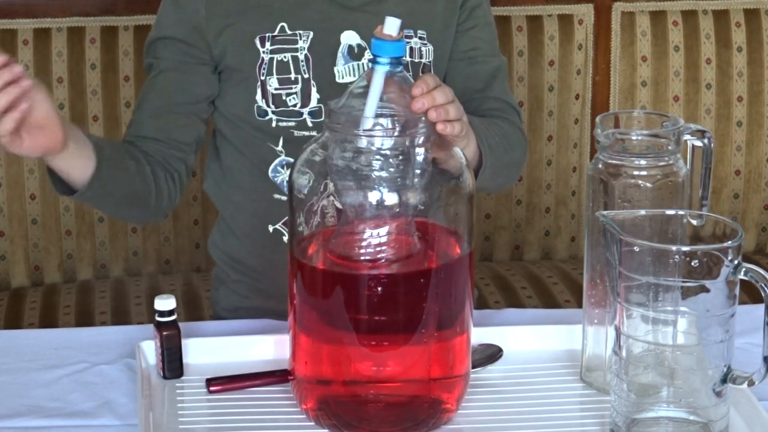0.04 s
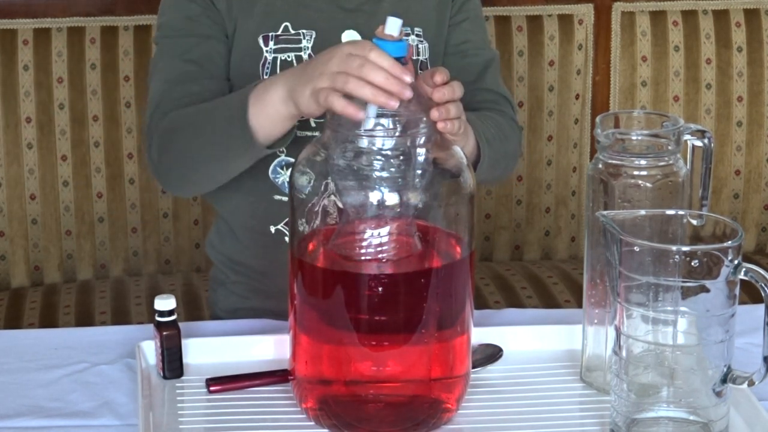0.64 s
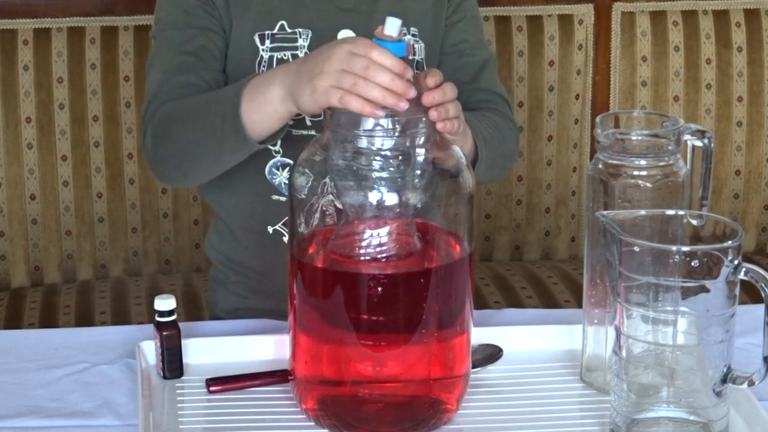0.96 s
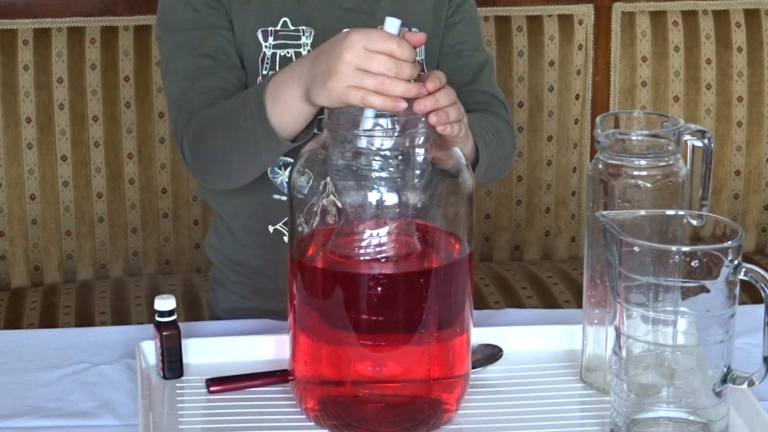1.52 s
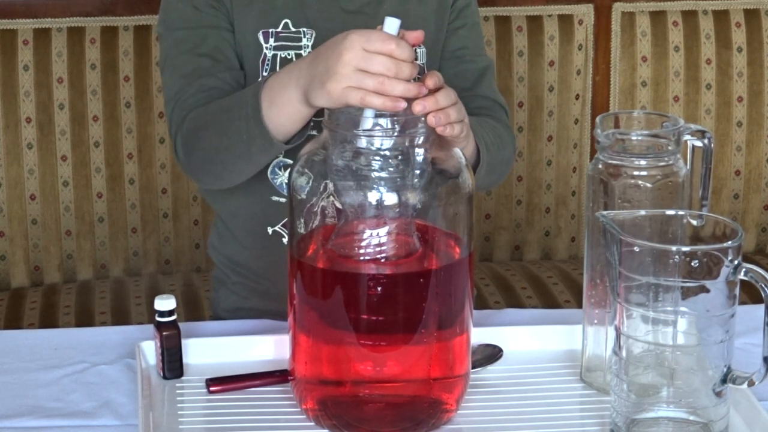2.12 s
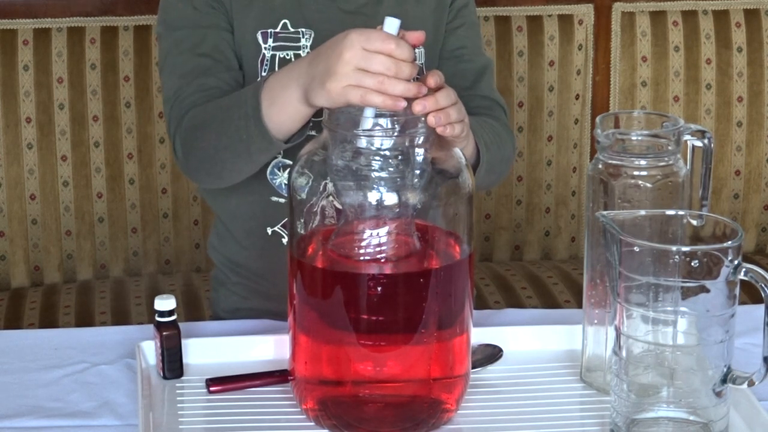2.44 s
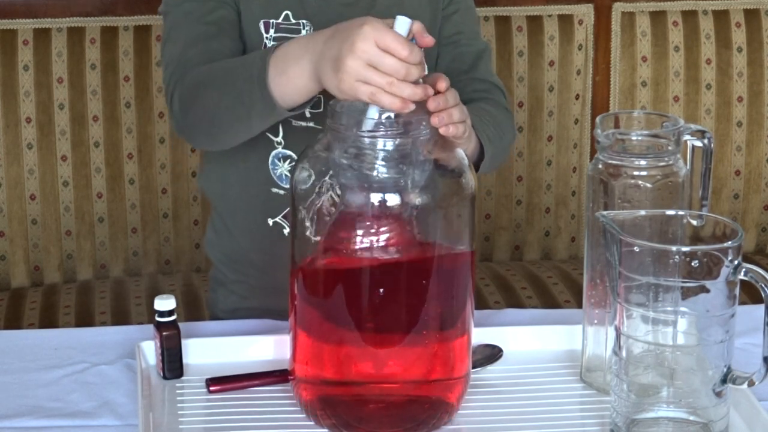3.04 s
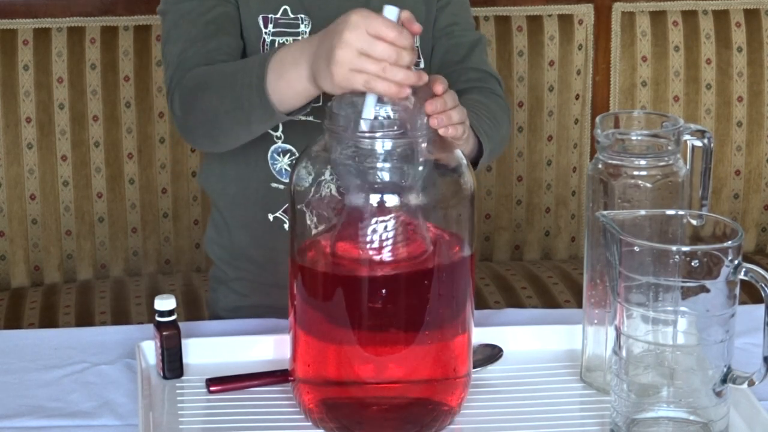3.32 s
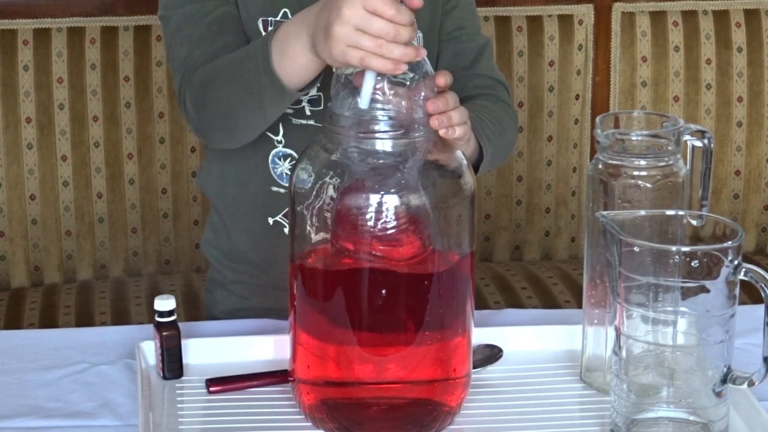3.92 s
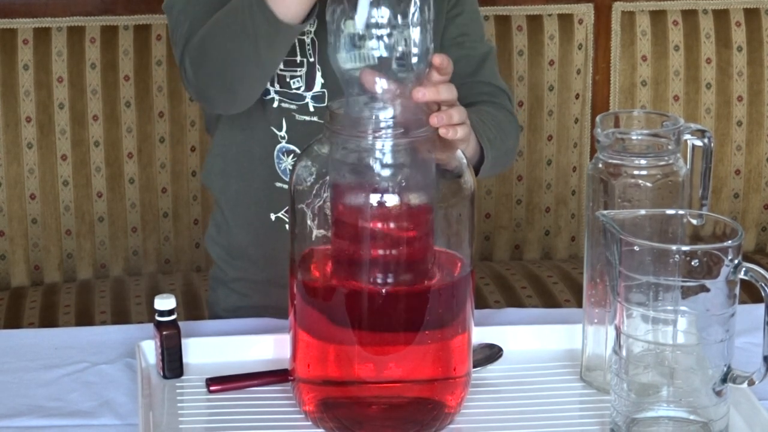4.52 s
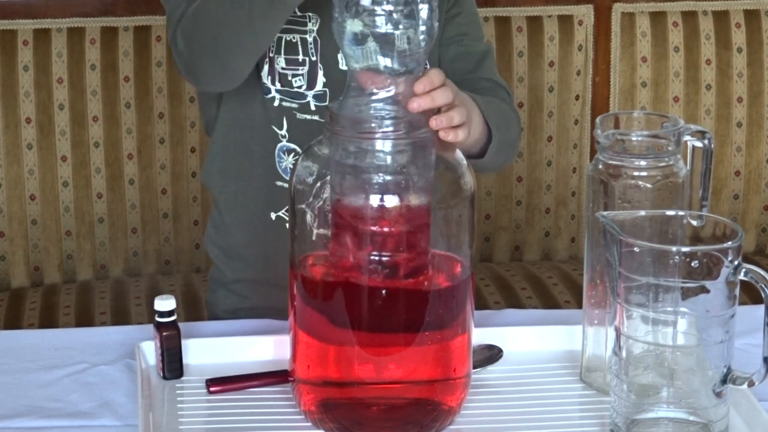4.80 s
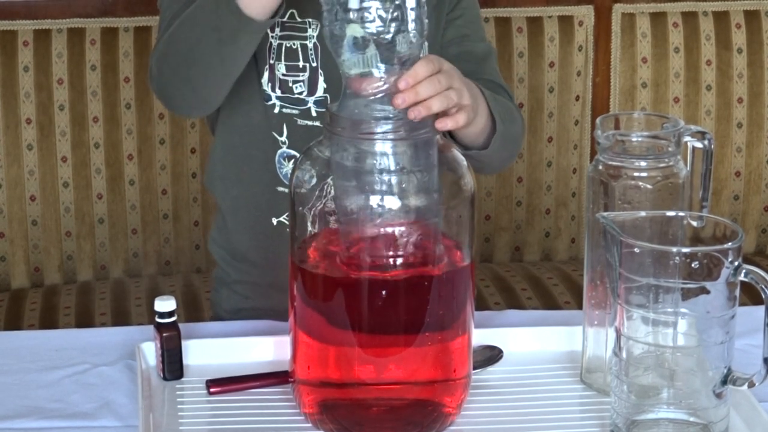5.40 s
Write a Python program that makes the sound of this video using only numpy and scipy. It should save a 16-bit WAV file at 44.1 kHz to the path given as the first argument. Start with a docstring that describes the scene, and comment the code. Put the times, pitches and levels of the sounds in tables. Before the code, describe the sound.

A plastic bottle snaps once and gives a few faint clicks over quiet room noise. It crackles, then bumps dully and rubs against a glass jar as it is lifted out. Its dented wall springs back with loud pops while air hisses in through a straw with a breathy, pipe-like ring. Finally water drips, gulps and bubbles in the jar. The sound is near and almost central, in a small room.

```python
"""A plastic snap over faint room noise: a bottomless bottle with a straw in its cap is gripped and
lifted out of a glass jar of water, in a small room. Its wall buckles, rubs and bumps on the jar.
As the water drains, air hisses in through the straw, ringing it like a pipe, and dents in the wall
spring out with loud pops. At the end the rim leaves the water with drips, gulps and small bubbles."""
import sys
import numpy as np
from scipy import signal
from scipy.fft import rfft, irfft
from scipy.io import wavfile
from scipy.ndimage import uniform_filter1d

SR = 44100
rng = np.random.default_rng(int(sys.argv[2]) if len(sys.argv) > 2 else 0)


def unload_wav(signal):
    """Save mono or channel-first audio to the path in sys.argv[1] as 16-bit WAV at rate SR, clipped to [-1, 1]."""
    wavfile.write(
        sys.argv[1],
        SR,
        np.round(np.clip(np.atleast_2d(signal).T, -1, 1) * 32767).astype(np.int16),
    )


N = 244755

# edges of a click's low, middle, high and top band: f/Hz
BAND_EDGES = [150, 1000, 2600, 7000, 14000]
# room tone and the wash of water: f/Hz, level/dB
ROOM_TONE_EQ = [(22, -30), (36, -24.5), (48, 4.5), (68, -5), (100, 0), (200, -2.5), (390, -6), (620, -8.5),
                (1050, -7.5), (1400, -14), (2000, -15.5), (3500, -19), (11500, -24.5), (16000, -30.5)]
WASH_EQ = [(20, -34), (33, -16), (48, -9), (80, -3), (145, -3.5), (300, -3), (600, -5), (1100, -8.5),
           (2500, -23.5)]
# water heaves under the bottle, one long swell and two surges: t/s, level/dB, rise/s, fall/s, hold/s
HEAVES = [(2.96, -61.5, .15, 0.57, 2.94), (3.223, -62.5, 0.072, 0.105, 0.033),
          (4.676, -48.5, 0.076, 0.13, .01)]

# the plastic wall snaps: t/s, low, middle, high and top level/dB, crackle tail/dB
# (the tail is how strongly each snap crackles on after its first click)
SNAPS = [(.009, -39.5, -51.5, -54.5, -68, 10), (.516, -82, -47.5, -50, -60.5, 7),
         (.534, -58, -41.5, -55.5, -60.5, 11), (1.031, -79, -46.5, -57.5, -81.5, 9),
         (2.8065, -37.5, -43.5, -47, -72, 5), (2.8345, -49, -43.5, -35.5, -42.5, 6),
         (2.9275, -47, -40, -36.5, -42.5, 2.5), (3.3175, -65, -49, -53.5, -86, -5),
         (3.4735, -77, -24, -44, -81, -0.5), (3.7268, -31.5, -24.5, -22.5, -55, 5.5),
         (3.935, -77.5, -75, -79, -62.5, -19), (4.1207, -15.5, -20.5, -26.5, -48, 7)]
# body of the wall: f/Hz, level/dB
WALL_EQ = [(40, -44), (150, -12.5), (400, -12.5), (800, -2), (1150, 0.5), (1400, -4), (1950, 0), (2350, 0),
           (2600, -2.5), (4200, -1.5), (6000, 0.5), (8200, 1.5), (11300, 7.5), (13000, -12), (15000, -15)]
# hand and bottle bump the jar: t/s, level/dB
BUMPS = [(0.022, -47.5), (0.048, -50), (.795, -48.5), (0.816, -47), (1.11, -52), (1.133, -52.5),
         (2.943, -46), (2.964, -45), (3.155, -28), (3.175, -23), (3.197, -25), (3.212, -34), (3.728, -44.5),
         (4.643, -54), (4.675, -42.5)]
# the jar's dull ring: f/Hz, level/dB, t60/s
BUMP_MODES = [(51.5, -20, 0.98), (144.3, -11.5, 0.22), (202, 2.5, 0.055), (191.9, 1, 0.044),
              (253, -11.5, 0.6), (273, -20, 0.053), (400, -3, 0.027)]
# the jar's air hums as the bottle starts to move: t/s, level/dB, rise/s, fall/s, hold/s
JAR_HUM = (3, -50.5, 0.1, 0.18, 0.2)
# fingers rub the bottle, and the bottle the jar's neck: t/s, level/dB, rise/s, fall/s
RUBS = [(1.182, -55, .03, 0.094), (3.171, -35.5, 0.0284, 0.04), (3.445, -44, 0.064, 0.0197)]
# colour of the friction: f/Hz, level/dB
RUB_EQ = [(40, -35), (210, -7), (350, -15), (691, -24.5), (766, -2.5), (825, -12), (1210, -6.5),
          (1510, -11), (2300, -4.5), (3360, -11.5), (4390, -23), (12000, -39), (15600, -68), (22000, -120)]

# pulls draw air through the straw, the last while it drains: t/s, level/dB, rise/s, fall/s, hold/s
PULLS = [(3.414, -49, .12, 0.102, 0.0247), (3.751, -48, 0.113, 0.06, 0.012),
         (3.923, -60, .04, 0.104, 0.031), (4.062, -39, 0.079, 0.078, 0.026),
         (4.379, -44, 0.32, 0.32, 0.4896)]
# the straw's open-pipe modes: f/Hz, width/Hz, level/dB
STRAW_MODES = [(1496, 284, -1), (3038, 126, 2.5), (4410, 220, -0.5), (5675, 190, -2), (7150, 400, -5.5)]
# rushing air, fine fizz and mist: f/Hz, level/dB
RUSH_EQ = [(40, -35), (180, -7), (300, -11.5), (913, -11), (1460, -2.5), (2490, -11.5), (3060, 3),
           (3560, -11.5), (4370, -5), (7270, -12.5), (8000, -22), (10400, -61), (17600, -120)]
FIZZ_EQ = [(6000, -62), (8300, -17), (9050, 2), (9700, -9), (10400, 2), (10850, 2.5), (11350, 2.5),
           (12200, -8), (12900, -8), (14000, -19), (16000, -28)]
MIST_EQ = [(5000, -20), (9500, -6), (13500, -6), (16000, -4)]
# the long draught tears mist off the wet straw: t/s, level/dB, rise/s, fall/s, hold/s, sag/(dB/s)
MIST = (4.5, -54, .05, .08, 0, 25)
# the wall springs back: t/s, level/dB, most strongly driven f/Hz
POPS = [(3.4736, -32, 2240), (3.727, -24, 2160), (4.121, -14.5, 1030), (4.134, -16.5, 640)]
# the wall's ring: f/Hz, level/dB, t60/s
POP_MODES = [(286.4, 3.5, 0.19), (418, -32, .15), (465, -11, 0.25), (564, -10, 0.12), (649, 5.5, 0.15),
             (696.3, 1.5, 0.14), (676, -11.5, 0.24), (852, -5, 0.17), (925, -11, 0.21), (1068, -12.5, 0.3),
             (1148.5, 3.5, 0.108), (1187, 1.5, 0.27), (1305, -7.5, 0.16), (1750, -8.5, 0.25),
             (1790, -4, 0.19), (2028, -3, 0.14), (2200, 1, 0.071), (2377, -11, 0.16)]

# bursts of fine spray, and water churning under the rim as it clears the surface: t/s, level/dB
SPRAYS = [(3.76, -52), (4.37, -47), (4.489, -50), (5.205, -48), (5.435, -55)]
CHURNS = [(4.992, -44.5), (5.05, -49), (5.235, -49.5)]
# hollow colour of the churn: f/Hz, level/dB
CHURN_EQ = [(300, -35), (480, 6.5), (560, 8), (740, 4.5), (950, -3), (1150, -4), (1400, -28), (2500, -22.5)]
# drops fall inside the jar: t/s, level/dB, brightness/(dB/octave)
DRIPS = [(4.820, -38.5, 1.5), (4.9207, -43, 7), (5.0145, -26.5, 1), (5.0178, -32.5, 2), (5.0445, -47, 0),
         (5.12, -36, -0.5), (5.1823, -30.5, 5), (5.238, -43, 3), (5.2898, -41.5, 4), (5.3015, -38, 5),
         (5.393, -49.5, 1.5), (5.4378, -41, -4.5), (5.446, -50, 0)]
# tone that all drops share: low, middle, high and top level/dB
DRIP_BANDS = [-16.5, -1, -13.5, -9]
# the jar's hollow: f/Hz, level/dB
JAR_EQ = [(100, -10), (850, -20), (1150, 8.5), (1350, -2), (1850, 1), (2600, 1.5), (3050, -9), (3600, 4),
          (4400, -7), (5300, 1.5), (8000, -8.5), (11300, 3), (15000, -45)]
# gulps of air and small bubbles: t/s, f/Hz, level/dB, t60/s
BUBBLES = [(4.986, 700, -33, 0.07), (4.994, 637, -32.5, 0.057), (5.011, 534, -34.5, 0.187),
           (5.046, 700, -36, 0.04), (5.054, 564, -30, .065), (5.078, 545, -36, .16),
           (5.151, 2856, -49.5, 0.052), (5.157, 2815, -44.5, 0.13), (5.187, 2846, -46, 0.22),
           (5.224, 566, -45, .069), (5.225, 1123, -41, 0.099), (5.245, 528.2, -36.5, .16)]
# a bright double ping in the jar: t/s, level/dB
PINGS = [(5.2904, -33), (5.296, -19)]
# its ring: f/Hz, level/dB, t60/s
PING_MODES = [(2700, -26, 0.042), (3550, -28, 0.095), (6970, -18, 0.072), (8250, -34, 0.15),
              (10260, 0.5, 0.017), (10730, -14.5, 0.055)]

# the small room's decay: f/Hz, t60/s
ROOM_DECAY = [(150, 0.53), (600, 0.31), (2000, 0.3), (5000, 0.26), (12000, 0.23)]
# stereo width of reflections and background: f/Hz, side against mid level/dB
REFLECTION_WIDTH = [(100, -43), (300, -26), (700, -18), (1500, -15.5), (4000, -12.5), (12000, -42)]
BACKGROUND_WIDTH = [(60, -22.5), (150, -14), (380, -7.5), (950, -5.5), (2380, -4.5), (5980, -11.5),
                    (15000, -21)]
# pan of bottle and jar: f/Hz, left minus right level/dB
PAN = [(150, 0), (600, -.5), (1200, -.8), (2500, -.8), (5000, -1.4), (9000, -2), (14000, -1)]

FULL_DRAUGHT_DB = -45  # the pull level that counts as full flow


def amp(db):
    """Decibels to gain."""
    return 10 ** (np.asarray(db) / 20)


def unit(x):
    """Scales to rms 1."""
    return x / np.sqrt(np.mean(x ** 2) + 1e-20)


def read(points, hz):
    """Reads a table on a log-frequency axis."""
    f, value = np.transpose(points)
    return np.interp(np.log(hz + 1), np.log(f + 1), value)


def add(mix, s, sound):
    """Mixes a sound in at time s."""
    part = mix[..., max(round(s * SR), 0):][..., :sound.shape[-1]]
    part += sound[..., :part.shape[-1]]


def equalise(x, eq):
    """Filters by an EQ curve."""
    size = x.shape[-1]
    return irfft(rfft(x) * amp(read(eq, np.fft.rfftfreq(size, 1 / SR))), size)


def shaped(x, eq):
    """Gives a signal a colour, at rms 1."""
    return unit(equalise(x, eq))


def low_cut(x, hz):
    """A small body cannot radiate deep bass."""
    highpass = signal.butter(2, hz, "high", fs=SR, output="sos")
    return signal.sosfilt(highpass, x + 1e-18 * rng.standard_normal(N))


def wander(span_s):
    """Smooth random drift that changes over about span_s, rms 1."""
    size = max(round(span_s * SR), 1)
    return unit(uniform_filter1d(uniform_filter1d(rng.standard_normal(N), size), size))


def patter(per_s):
    """A random train of tiny impacts of uneven size, rms 1."""
    return unit(rng.standard_normal(N) * (rng.random(N) < per_s / SR))


def stroke(s, db, rise_s, fall_s, hold_s=0, sag_db_per_s=0):
    """Envelope of one movement: it peaks at s, holds and dies; rise and fall are times for 20 dB."""
    t = np.arange(N) / SR - s
    outside = np.maximum(-t / rise_s, 0) + np.maximum((t - hold_s) / fall_s, 0)
    return amp(db - 20 * outside - sag_db_per_s * np.clip(t, 0, hold_s))


def ring(modes, contact_s):
    """Modes die away after one blow; longer contact softens the attack."""
    t = np.arange(SR // 2) / SR
    tones = sum(amp(db - 60 * t / t60) * np.sin(2 * np.pi * hz * t) for hz, db, t60 in modes)
    return tones * (1 - np.exp(-t / contact_s))


def resonate(x, hz, width_hz):
    """A resonance that follows the curve hz, applied twice for steep sides."""
    carrier = np.exp(2j * np.pi * np.cumsum(hz) / SR)
    pole = np.exp(-np.pi * width_hz / SR)
    return unit((carrier * signal.lfilter([1], [1, -2 * pole, pole * pole], x / carrier)).real)


def stereo(pair, width):
    """Left and right from a shared mid and a weak side signal."""
    mid, side = pair[0], equalise(pair[1], width)
    return np.array([mid + side, mid - side])


def tail_response(tail_db):
    """Direct sound, then dense random taps that die band by band."""
    size = SR // 3
    taps = rng.choice([-1., 1.], (2, size)) * (rng.random((2, size)) < .12)
    hz, t, spectrum = signal.stft(taps, SR, nperseg=256)
    decay = amp(-60 * t / read(ROOM_DECAY, hz)[:, None])
    tail = signal.istft(spectrum * decay, SR, nperseg=256)[1][:, :size]
    tail *= 1 - np.exp(-np.arange(size) / SR / 0.0019)
    response = stereo(tail / np.linalg.norm(tail[0]), REFLECTION_WIDTH) * amp(tail_db)
    response[:, 0] += 1
    return response / np.linalg.norm(response[0])


def with_tail(x, tail_db):
    """Adds a stereo tail: the room's reflections or, on a snap, its crackle."""
    return signal.fftconvolve(x[None], tail_response(tail_db), axes=1)[:, :N]


def band_centres():
    """Middle of each click band in Hz."""
    edges = np.array(BAND_EDGES)
    return np.sqrt(edges[1:] * edges[:-1])


def clicks(rows, body_eq, gain_db, burst_s, size=2048):
    """Each click is a tiny burst, coloured by its band levels and by the body that it shakes."""
    out = np.zeros((2, N))
    hz, t = abs(np.fft.fftfreq(size, 1 / SR)), np.arange(size) / SR
    for s, *bands_db, tail_db in rows:
        density_db = bands_db - 10 * np.log10(np.diff(BAND_EDGES) / SR)
        colour_db = read(np.c_[band_centres(), density_db], hz) + read(body_eq, hz) + gain_db
        minimum_phase = np.exp(np.conj(signal.hilbert(np.log(amp(colour_db)))))
        burst = np.fft.fft(rng.standard_normal(size) * np.exp(-t / burst_s))  # smears the click in time
        pulse = np.fft.ifft(minimum_phase * np.exp(1j * np.angle(burst))).real
        add(out, s, with_tail(pulse[:size // 2], tail_db))
    return out


def background(room_tone_db=-60.5):
    """Steady room tone, joined by the low wash of moving water."""
    water, air = rng.standard_normal((2, 2, N))
    room_tone = amp(room_tone_db) * shaped(air, ROOM_TONE_EQ)
    wash = shaped(water, WASH_EQ) * sum(stroke(*heave) for heave in HEAVES)
    return stereo(room_tone + wash, BACKGROUND_WIDTH)


def snaps():
    """The plastic wall buckles with a sharp click and crackles on briefly."""
    return low_cut(clicks(SNAPS, WALL_EQ, gain_db=23, burst_s=0.00119), hz=159)


def bumps(hum_hz=139, drift_hz=7):
    """Soft blows ring the jar; its lowest air mode hums briefly between them."""
    knocks = np.zeros(N)
    for s, db in BUMPS:
        add(knocks, s, amp(db) * ring(BUMP_MODES, contact_s=0.0018))
    pitch = hum_hz + drift_hz * wander(0.029)
    hum = np.sin(2 * np.pi * np.cumsum(pitch) / SR) * stroke(*JAR_HUM)
    return low_cut(with_tail(knocks + hum, tail_db=-18), hz=81)


def rubbing():
    """Plastic sticks and slips under the fingers and on the glass."""
    slips = shaped(patter(per_s=4000), RUB_EQ)
    return with_tail(slips * sum(stroke(*rub) for rub in RUBS), tail_db=3)


def draught(sag_db_per_s):
    """Air flow from all pulls, 1 at full draught; it weakens as the water column falls."""
    return sum(stroke(*pull, sag_db_per_s) for pull in PULLS) / amp(FULL_DRAUGHT_DB)


def straw(pipe_db=-1.5, rush_db=-2.5, fizz_db=-8, spit_db=-8, flutter_db=2.0, sputter_db=1.5):
    """The draught rings the straw's pipe modes unsteadily, amid rush, fizz, spits and mist."""
    flow = draught(sag_db_per_s=4.5)
    pipe_drive = draught(sag_db_per_s=9.5)  # the tones fade sooner than the rush
    jet, rush_noise, fizz_noise = rng.standard_normal((3, N))
    waver = 1 + 0.0036 * wander(.04)
    modes = sum(amp(db) * resonate(jet, hz * waver, width) for hz, width, db in STRAW_MODES)
    sputter = amp(sputter_db * wander(0.0176))
    pipe = amp(pipe_db) * unit(modes * sputter) * pipe_drive ** 1.05
    spits = amp(spit_db) * patter(per_s=120)
    rush = amp(rush_db) * shaped(rush_noise + spits, RUSH_EQ) * flow ** 1.05
    fizz = amp(fizz_db) * shaped(fizz_noise + spits, FIZZ_EQ) * flow ** 1.34  # hard pulls are brighter
    mist = shaped(patter(per_s=3500), MIST_EQ) * stroke(*MIST)
    level = amp(FULL_DRAUGHT_DB + flutter_db * wander(0.023))
    return with_tail(level * (pipe + rush + fizz) + mist, tail_db=-1)


def pops(falloff_db_per_octave=12):
    """A dent springs out and drives the wall modes nearest its own pitch."""
    out = np.zeros(N)
    for s, level_db, centre_hz in POPS:
        modes = [(hz, db - falloff_db_per_octave * abs(np.log2(hz / centre_hz)), t60)
                 for hz, db, t60 in POP_MODES]
        add(out, s, amp(level_db) * ring(modes, contact_s=0.00128))
    return with_tail(low_cut(low_cut(out, hz=190), hz=190), tail_db=-11)


def splashing():
    """Droplets fizz high up; breaking pockets of water churn in the hollow of the jar."""
    spray = shaped(patter(per_s=3000), FIZZ_EQ)
    spray *= sum(stroke(s, db, rise_s=0.019, fall_s=0.028) for s, db in SPRAYS)
    churn = shaped(patter(per_s=500), CHURN_EQ)
    churn *= sum(stroke(s, db, rise_s=0.076, fall_s=0.095) for s, db in CHURNS)
    return with_tail(spray + churn, tail_db=-3)


def drips(pivot_hz=2430, tail_db=-10):
    """Each drop ticks in the hollow of the jar, some duller and some brighter."""
    octaves = np.log2(band_centres() / pivot_hz)
    rows = [(s, *(db + tilt * octaves + DRIP_BANDS), tail_db) for s, db, tilt in DRIPS]
    return low_cut(clicks(rows, JAR_EQ, gain_db=17, burst_s=0.00087), hz=298)


def bubbles(glide_per_s=0.234, swell_cycles=2.14):
    """Each pocket of air swells, rings and rises a little in pitch, wobbling in the moving water."""
    t, out = np.arange(SR // 4) / SR, np.zeros(N)
    wobble = 0.0065 * wander(0.00185)
    for s, hz, db, t60 in BUBBLES:
        pitch = hz * (1 + glide_per_s * t + np.interp(s + t, np.arange(N) / SR, wobble))
        envelope = amp(db - 60 * t / t60) * (1 - np.exp(-t * hz / swell_cycles))
        add(out, s, envelope * np.sin(2 * np.pi * np.cumsum(pitch) / SR))
    return with_tail(out, tail_db=-19)


def pings():
    """Two tiny sharp taps ring the same high modes in the jar."""
    out = np.zeros(N)
    for s, db in PINGS:
        add(out, s, amp(db) * ring(PING_MODES, contact_s=0.00023))
    return with_tail(out, tail_db=-22)


def scene(lag_s=4e-6):
    """Bottle, straw and water sit a little to the right: the left side gets them later and softer."""
    bottle = snaps() + pops() + rubbing() + bumps()
    water = drips() + bubbles() + pings() + splashing()
    hz = np.fft.rfftfreq(N, 1 / SR)
    left = amp(read(PAN, hz) / 2) * np.exp(-1j * np.pi * hz * lag_s)
    panned = irfft(rfft(bottle + water + straw()) * np.array([left, 1 / left]), N)
    return panned + background()


def record(dry):
    """A steep high cut takes off the very top."""
    high_cut = signal.firwin(511, 15750, window=("kaiser", 9), fs=SR)
    return signal.oaconvolve(dry, high_cut[None], "same")


dry = scene()
out = record(dry)
unload_wav(out)
```